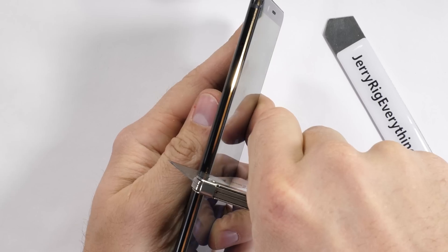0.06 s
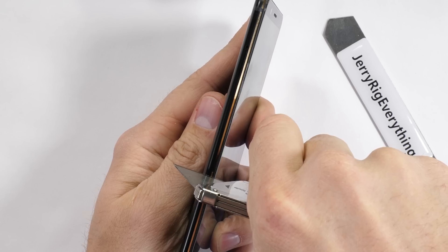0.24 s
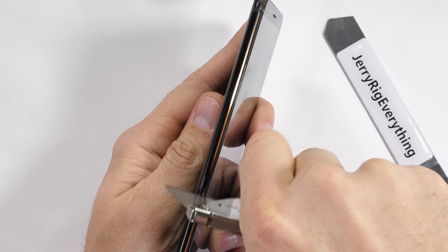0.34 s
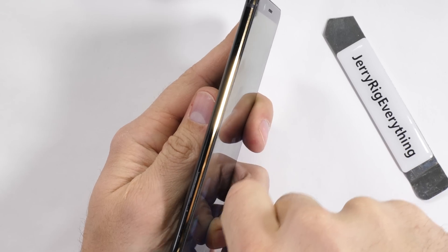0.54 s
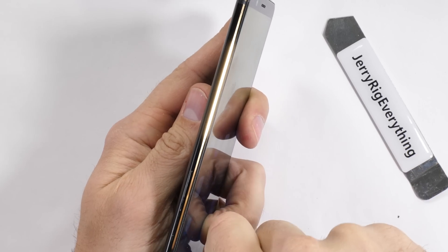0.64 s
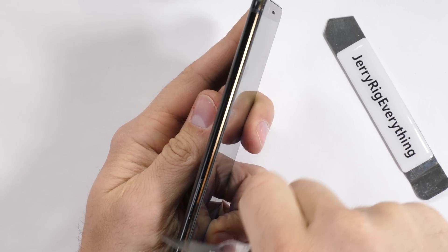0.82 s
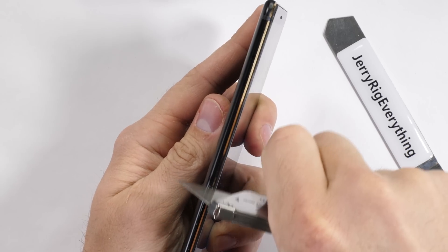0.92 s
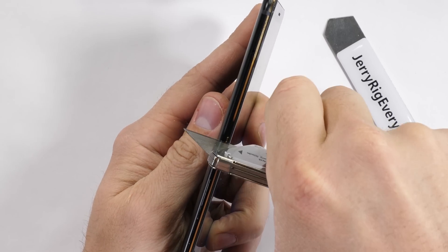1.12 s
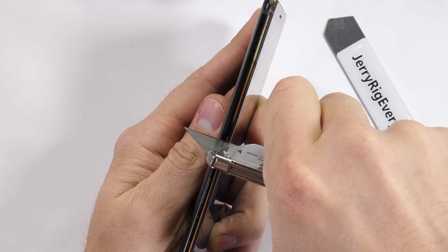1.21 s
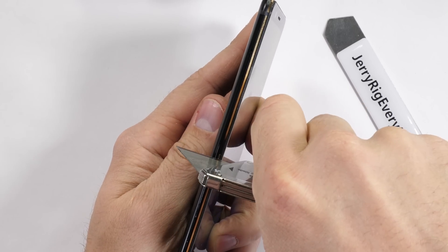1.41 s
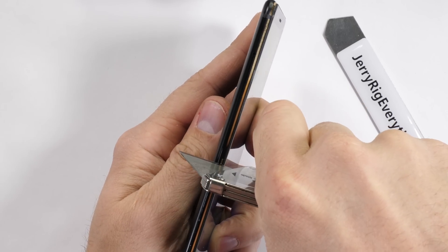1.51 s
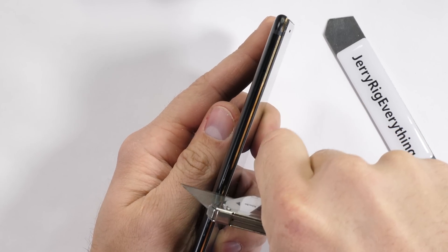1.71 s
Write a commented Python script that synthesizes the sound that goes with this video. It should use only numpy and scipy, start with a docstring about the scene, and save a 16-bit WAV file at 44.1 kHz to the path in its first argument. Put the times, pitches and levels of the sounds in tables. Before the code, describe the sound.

Close, dry scraping of a thin blade on a metal phone frame. A bright click leads into rapid scratches and a falling squeal; after a pause come a duller tap, a soft slide and weaker scratches over faint room air.

```python
"""Faint hum, room air and hand rumble come first, then a tick and a tap as a razor blade is set on the metal
side frame of a phone, close to the microphone. Stuttering scrapes follow: filtered click and hiss noise
that rings sinking resonances. The longest slip squeals as the blade runs off: wavering sines and narrow noise.
A second tap (noise crack, dying modes) leads to a soft slide and lighter slips. A faint room tail follows."""
import sys
import numpy as np
from scipy import signal
from scipy.io import wavfile
from scipy.ndimage import uniform_filter1d

SR = 44100
rng = np.random.default_rng(int(sys.argv[2]) if len(sys.argv) > 2 else 0)


def linear_from_db(decibels):
    """Turn decibels (scalar or array-like) into linear amplitude factors; 0 gives 1."""
    return 10 ** (np.asarray(decibels, float) / 20)


def master(y):
    """Save y as 16-bit WAV."""
    cut = np.clip(np.atleast_2d(y).T, -1, 1)
    pcm = np.round(cut * 32767)  # scale
    wavfile.write(sys.argv[1], SR, pcm.astype(np.int16))


N = 77175  # samples

# Room air: f/Hz, relative density/dB; its swell: t/s, level re AIR_DB/dB
AIR_TONE = [(150, -22), (250, -10), (400, -22.5), (830, -17), (1500, -15), (2160, -13.5), (3170, -9.5),
            (4650, -19.5), (8400, -20.5), (12000, -24), (16000, -28.5)]
AIR_SWELL = [(0, 7), (.04, -7.5), (.085, -2.5), (.11, -3), (.19, 1), (.8, 3), (.95, -6.5), (1.75, -5)]
# Mains hum: f/Hz, rms level/dB
HUM = [(60, -56.5), (120, -64.5)]
# Rumble of hands and table: t/s, level/dB; its spectrum: f/Hz, relative density/dB
RUMBLE_LEVEL = [(0.0, -50), (0.116, -54), (0.32, -50), (0.346, -41), (0.448, -41.5), (0.496, -31.5),
                (0.526, -49.5), (0.55, -30), (0.588, -48), (0.614, -32.5), (0.658, -53.5), (0.764, -48),
                (0.832, -54), (1.35, -52), (1.378, -43), (1.52, -38), (1.594, -52), (1.75, -51)]
RUMBLE_TONE = [(12, -50), (20, 7.5), (80, 8), (173, -7.5), (211, -0.5), (348, -10), (414, -17.5),
               (500, -14.5), (650, -18.5), (1100, -120)]
# Small catches of the blade: t/s, relative level/dB
TICKS = [(0.164, -35), (0.2412, -24.5), (0.82, -42), (0.8442, -43), (0.9129, -35.5), (1.0055, -32),
         (1.274, -42), (1.5594, -31), (1.6163, -35.5)]
# Room tail: f/Hz, relative level/dB, t60/s
ROOM_TAIL = [(500, -0.5, 0.33), (3010, 1.5, 0.24), (5960, 0, 0.11), (9000, -12, 0.2), (14980, -25.5, 0.035)]
# Taps: level/dB, crack re tap/dB, crack high-pass f/Hz, whole-tap high-pass f/Hz
TAP_ONE = (-3, -9, 1501.5, 150.5)
TAP_TWO = (-8.5, -10.5, 1999, 704)
# Modes rung by each tap: f/Hz, level re tap/dB, t60/s
TAP_ONE_MODES = [(8940, 9, 0.0051), (11100, -26, 0.0058), (6210, -10.5, 0.0072), (3180, -14, 0.014),
                 (309.5, -23, 0.014), (490, -26.5, 0.017)]
TAP_TWO_MODES = [(3200, -1, 0.0088), (2055, 1, 0.0081), (1330, -12, 0.019), (4310, -5.5, 0.014),
                 (5800, -18, 0.0047), (7760, -34, 0.01), (9700, -7.5, 0.0041), (12800, -18, .005)]
# Close pair of frame modes: f/Hz
BEAT_HZ = [1783, 1773]
# Blade creeping after the first tap: t/s, level/dB; its spectrum: f/Hz, relative density/dB
CREEP_LEVEL = [(.201, -31.5), (.215, -36.5), (.25, -45), (.3, -58.5), (.335, -83.5)]
CREEP_TONE = [(1290, -38), (2200, -4), (2510, -20), (3200, -8.5), (4530, -13), (7450, -9), (9250, 3),
              (12400, -35.5), (16000, -10)]
# Slips: start/s, length/s, level/dB, peak moment/0-1, contact (0 high on the frame, 1 low, 2 light touch)
SLIPS = [(0.339, 0.018, -20.5, 0.45, 0), (0.365, 0.019, -21.5, 0.78, 0), (.392, 0.018, -22, 0.52, 0),
         (0.408, 0.0084, -33, 0.34, 0), (.418, 0.035, -22.5, 0.25, 0), (0.447, 0.019, -22.5, 0.93, 0),
         (0.4844, 0.011, -23.5, 0.17, 1), (0.486, 0.014, -13.5, 0.78, 1), (0.498, 0.0094, -24.5, 0.18, 0),
         (.508, .011, -25, 0.78, 0), (0.531, 0.0009, -15, 0.056, 0), (0.5355, 0.008, -24.5, 0.083, 0),
         (.541, 0.018, -13.5, 0.45, 1), (0.562, 0.0072, -29.5, 0.47, 0), (0.566, 0.023, -14, 0.34, 1),
         (0.584, 0.01, -24.5, .5, 1), (1.3701, 0.013, -24, 0.087, 2), (1.393, 0.014, -37.5, 0.43, 2),
         (1.414, 0.0012, -30, .1, 2), (1.417, 0.0031, -25, 0.34, 2), (1.421, 0.0038, -26, 0.42, 2),
         (1.436, 0.015, -31, 1, 2), (1.442, .055, -22, 0.15, 2), (1.4787, 0.0017, -34, 0.33, 2),
         (1.504, 0.013, -24, .3, 2), (1.534, 0.005, -32.5, .2, 2), (1.538, 0.0086, -36, .15, 2)]
# Per contact: hiss rms re clicks, snag rms re clicks, swell exponent (low = blunt, high = pointed)
SLIP_HISS = [.4, 3.9, 0.24]
SLIP_SNAG = [0.36, 0.1, 0.94]
SLIP_EXPONENT = [0.48, 0.82, 0.39]
# Scrape spectrum at each contact: f/Hz, relative density/dB
HIGH_TONE = [(120, -52.5), (200, -10.5), (278, -10.5), (612, -14.5), (968, -15), (1080, -6), (1420, -16),
             (1940, -8), (2510, -16.5), (3970, -10.5), (4520, -16.5), (7970, -2.5), (11900, -13.5),
             (13600, -9.5), (16000, -13.5)]
LOW_TONE = [(88, -44), (150, -24.5), (309, -8), (414, -20), (545, -18.5), (837, -34), (1900, -16),
            (2500, -24.5), (3160, -12), (4760, -21), (5250, -3.5), (6910, 4.5), (7620, -16), (10200, -6),
            (16000, -22.5)]
LIGHT_TONE = [(88, -36), (150, -20.5), (1120, -10.5), (1360, -11), (1980, -7), (2700, -14), (3290, -12),
              (4760, -18.5), (6390, -14), (7470, 1), (11900, -20), (14200, 0), (16000, -15)]
# Resonances at each contact: start f/Hz, width/Hz, level re drive/dB, fall during the slip/Hz (negative rises)
HIGH_RING = [(8740, 660, -3, 140), (2040, 90, -12.5, 100)]
LOW_RING = [(6980, 140, -5, 58), (6200, 150, -17, 29), (5620, 110, -15, 619.5), (4490, 96, -20.5, 30),
            (3320, 90, -20, 55.5), (1900, 88, -14, -49.5)]
LIGHT_RING = [(7420, 170, -16, 150), (5860, 110, -24.5, 30), (2000, 140, -25.5, 73)]
# Run-off scrape: t/s, level/dB; its spectrum: f/Hz, relative density/dB
RUNOFF_LEVEL = [(.6052, -17), (.611, -16), (.622, -25), (.64, -22), (.66, -31.5), (.673, -23.5), (.69, -27),
                (.715, -33.5), (.74, -50.5), (.8, -63), (.92, -62)]
RUNOFF_TONE = [(180, -61), (400, -38), (650, -31.5), (900, -16), (1300, -28), (2070, -9.5), (2500, -21),
               (3200, -5.5), (3900, -21), (5000, -6), (6500, -9), (8000, -20.5), (12000, -19.5),
               (16000, -36.5)]
# Blade squeals, frame ring and treble sheen of the run-off: t/s, f/Hz, level/dB
SQUEAL_LOW = [(.6052, 5685, -29.5), (.610, 5607, -6), (.613, 5627, -14.5), (.616, 5653, -14.5),
              (.621, 5568, -37.5), (.625, 5580, -3), (.6285, 5516, -28.5), (.636, 5376, -5),
              (.6415, 5390, -21), (.6475, 5402, -3), (.656, 5276, -21.5), (.661, 4907, -21),
              (.670, 4620, -15), (.679, 4510, -33.5), (.715, 4500, -40), (.74, 5270, -44), (.92, 5290, -81)]
SQUEAL_HIGH = [(.6052, 6900, -33.5), (.613, 6850, -5), (.620, 6850, -17), (.628, 6870, -13.5),
               (.636, 6600, -30), (.643, 6420, -18.5), (.653, 6350, -24), (.658, 6210, -16),
               (.665, 6150, -32.5), (.671, 6030, -17.5), (.68, 6050, -53.5), (.715, 6400, -52.5),
               (.8, 6400, -61)]
FRAME_RING = [(.6052, 1900, -28), (.613, 1985, -31), (.619, 1995, -16.5), (.628, 1985, -19),
              (.642, 2043, -26.5), (.66, 2080, -27), (.68, 2045, -44), (.689, 2097, -28),
              (.71, 2050, -32.5), (.721, 2000, -29.5), (.74, 2040, -58), (.8, 2060, -78.5)]
SHEEN = [(.605, 12900, -32), (.611, 12800, -12), (.65, 11000, -24), (.675, 11300, -26.5), (.69, 10500, -39),
         (.72, 9300, -53)]
# Clean tone in squeals and ring: t/s, share/0-1
CLEAN_SHARE = [(.6, 0.7), (.65, 0.75), (.665, 0.42), (.74, 0)]
# Slide after the second tap: t/s, gain/dB; its spectrum: f/Hz, relative density/dB
SLIDE_GAIN = [(1.067, -26), (1.08, -42.5), (1.12, -40.5), (1.16, -41.5), (1.185, -62), (1.22, -80)]
SLIDE_TONE = [(400, -44.5), (800, -40), (1300, -12.5), (1950, -6), (2300, -13.5), (2650, -27.5),
              (3100, -3.5), (3500, -9.5), (3800, -10.5), (4100, -23), (4400, -10), (4800, -14.5),
              (5170, -13), (6000, -22), (7700, -30.5), (9000, -18.5), (10800, -35.5), (11700, -27.5),
              (16000, -38)]
# Frame resonance under the slide: f/Hz, width/Hz, level re rub/dB
SLIDE_RING = (3464, 380, -12.5)

AIR_DB, ROOM_DB = -56.5, -17.5
TICK_DECAY_S = 0.0012
TAP_ONE_S, TAP_TWO_S = 0.1996, 1.0634
CRACK_T60_S, TAP_RISE_S = 0.018, 0.00035
BEAT_DB, BEAT_T60_S = -26, 0.22  # dB of each mode
CLICKS_PER_S, CLICK_SPREAD_DB, HISS_RATIO = 4000, 4, 0.87
SNAGS_PER_S = 410
SQUEAL_WIDTH_HZ, RING_WIDTH_HZ, SHEEN_WIDTH_HZ = 96, 75, 4100
WOBBLE_RATIO, WOBBLE_S = 0.012, 0.0037  # rms pitch deviation, smoothing time
LOWPASS_HZ = 15850


def evened(x):
    """Scale to rms 1."""
    return x / np.sqrt(np.mean(x ** 2) + 1e-20)


def along(rows, col, outside=None):
    """Interpolate one column over time, per sample."""
    rows = np.asarray(rows, float)
    return np.interp(np.arange(N) / SR, rows[:, 0], rows[:, col], outside, outside)


def colour(x, tone):
    """Minimum-phase filter of unit energy with the given spectrum."""
    f, db = np.transpose(tone)
    hz = np.abs(np.fft.fftfreq(8192, 1 / SR))
    tone_db = np.interp(np.log(hz + 1), np.log(f + 1), np.maximum(db, -90))
    log_gain = np.log(linear_from_db(tone_db))
    phase = -signal.hilbert(log_gain).imag
    taps = np.fft.ifft(np.exp(log_gain + 1j * phase)).real[:4096]
    return signal.oaconvolve(x, taps / np.linalg.norm(taps))[:N]


def resonate(x, hz, width_hz):
    """Resonance following the curve hz: shift to 0 Hz, one-pole low-pass, shift back; rms 1."""
    turn = np.exp(2j * np.pi * np.cumsum(hz) / SR)
    pole = np.exp(-np.pi * width_hz / SR)
    slow = signal.lfilter([1 - pole], [1, -pole], x / turn)
    return evened((turn * slow).real)


def chatter(snag=0, hiss=HISS_RATIO):
    """Edge catching on metal: dense clicks of uneven size, sparse larger snags, fine hiss; rms 1."""
    chance, size, noise = rng.random(N), rng.exponential(1, N), rng.standard_normal(N)
    sign = np.sign(noise)
    clicks = (chance < CLICKS_PER_S / SR) * sign * linear_from_db(CLICK_SPREAD_DB * np.minimum(size, 4))
    at = np.cumsum(SR / SNAGS_PER_S * rng.uniform(0.5, 1.5, N))
    snags = np.zeros(N)
    snags[at[at < N].astype(int)] = 1
    snags *= sign * rng.uniform(0.35, 1, N)
    return evened(evened(clicks) + snag * evened(snags) + hiss * rng.standard_normal(N))


def background():
    """Room air and hand rumble as filtered noise, mains hum as sines."""
    t = np.arange(N) / SR
    air = colour(rng.standard_normal(N), AIR_TONE) * linear_from_db(AIR_DB + along(AIR_SWELL, 1))
    hum = sum(linear_from_db(db) * np.sqrt(2) * np.sin(2 * np.pi * hz * t) for hz, db in HUM)
    rumble = colour(rng.standard_normal(N), RUMBLE_TONE + [(2000, -93)])
    return air + hum + rumble * linear_from_db(along(RUMBLE_LEVEL, 1))


def ticks():
    """Tiny catches of the resting blade: noise with abrupt onset and exponential decay."""
    t = np.arange(N) / SR
    push = sum(linear_from_db(db) * (t > s) * np.exp(-np.abs(t - s) / TICK_DECAY_S) for s, db in TICKS)
    return colour(0.5 * push * rng.standard_normal(N), HIGH_TONE)


def room(x):
    """Short, faint noise tail, its decay and level set by frequency; the highest treble is weakest and shortest."""
    hz, t, z = signal.stft(rng.standard_normal(SR // 2), SR, nperseg=128)
    f, db, t60 = np.transpose(ROOM_TAIL)
    decay = linear_from_db(-60 * t / np.interp(hz, f, t60)[:, None])
    tail = signal.istft(z * decay, SR, nperseg=128)[1]
    wet = signal.fftconvolve(x, tail / np.linalg.norm(tail))[:N]
    return colour(wet, np.transpose([f, db])) * linear_from_db(ROOM_DB)


def tap(start_s, db, crack_db, crack_hz, body_hz, modes):
    """A blow: high-passed noise crack and exponentially dying modes."""
    t = np.maximum(np.arange(N) / SR - start_s, 0)
    ring = sum(linear_from_db(mode_db - 60 * t / t60) * np.sin(2 * np.pi * hz * t) for hz, mode_db, t60 in modes)
    crack_filter = signal.butter(2, crack_hz, "high", fs=SR, output="sos")
    crack = signal.sosfilt(crack_filter, rng.standard_normal(N)) * linear_from_db(crack_db - 60 * t / CRACK_T60_S)
    blow = linear_from_db(db) * (ring + crack) * np.minimum(t / TAP_RISE_S, 1)
    return signal.sosfilt(signal.butter(2, body_hz, "high", fs=SR, output="sos"), blow)


def ping():
    """Two close frame modes beat and die away after the first tap, without room tail."""
    t = np.maximum(np.arange(N) / SR - TAP_ONE_S, 0)
    pair = sum(np.sin(2 * np.pi * hz * t) for hz in BEAT_HZ)
    return linear_from_db(BEAT_DB - 60 * t / BEAT_T60_S) * pair


def creep():
    """Blade creeping after the first tap: fading filtered chatter."""
    return colour(chatter() * linear_from_db(along(CREEP_LEVEL, 1, -99)), CREEP_TONE)


def slips():
    """Each slip swells and stops; contact sets its colour, and its resonances shift as the edge travels."""
    t = np.arange(N) / SR
    push, travel = np.zeros((3, N)), np.zeros((3, N))
    for start, length, db, peak, contact in SLIPS:
        k = int(round(contact))
        progress = (t - start) / length
        shape = np.interp(progress, [0, np.clip(peak, 0.02, 0.98), 1], [0, 1, 0])
        push[k] += linear_from_db(db) * np.sin(np.pi / 2 * shape) ** SLIP_EXPONENT[k]
        travel[k, t > start] = np.minimum(progress[t > start], 1)
    drives = np.array([chatter(snag, hiss) for snag, hiss in zip(SLIP_SNAG, SLIP_HISS)]) * push
    out = sum(colour(x, tone) for x, tone in zip(drives, (HIGH_TONE, LOW_TONE, LIGHT_TONE)))
    for x, way, modes in zip(drives, travel, (HIGH_RING, LOW_RING, LIGHT_RING)):
        for hz, width_hz, db, fall_hz in modes:
            out += np.std(x) * linear_from_db(db) * resonate(x, hz - fall_hz * way, width_hz)
    return out


def runoff():
    """Long slip: scrape, two sinking blade squeals, wavering frame ring, broad treble sheen."""
    out = colour(chatter() * linear_from_db(along(RUNOFF_LEVEL, 1, -99)), RUNOFF_TONE)
    share = np.clip(along(CLEAN_SHARE, 1), 0, 1)
    tones = ((SQUEAL_LOW, SQUEAL_WIDTH_HZ), (SQUEAL_HIGH, SQUEAL_WIDTH_HZ), (FRAME_RING, RING_WIDTH_HZ))
    for curve, width_hz in tones:
        wobble = evened(uniform_filter1d(rng.standard_normal(N), int(WOBBLE_S * SR)))
        hz = along(curve, 1) * (1 + WOBBLE_RATIO * wobble)
        clean = np.sqrt(2) * np.sin(2 * np.pi * np.cumsum(hz) / SR)
        rough = resonate(chatter(), hz, width_hz)
        out += (share * clean + (1 - share) * rough) * linear_from_db(along(curve, 2, -99))
    hz = along(SHEEN, 1)
    sheen = resonate(resonate(chatter(), hz, SHEEN_WIDTH_HZ), hz, SHEEN_WIDTH_HZ)
    return out + sheen * linear_from_db(along(SHEEN, 2, -99))


def slide():
    """Blade slides softly after the second tap: hissy chatter ringing one frame resonance."""
    hz, width_hz, db = SLIDE_RING
    rub = chatter(hiss=1.5)
    ring = linear_from_db(db) * resonate(rub, np.full(N, hz), width_hz)
    return colour((rub + ring) * linear_from_db(along(SLIDE_GAIN, 1, -99)), SLIDE_TONE)


def scene():
    """Mix blade, its room tail, the dry ping and the background."""
    blade = slips() + runoff()
    blade += tap(TAP_ONE_S, *TAP_ONE, TAP_ONE_MODES) + tap(TAP_TWO_S, *TAP_TWO, TAP_TWO_MODES)
    blade += ticks() + slide() + creep()
    return (blade + room(blade) + ping() + background())[None]


def band_limit(x):
    """A steep low-pass at the top of the band."""
    return signal.sosfilt(signal.butter(12, 16230, fs=SR, output="sos"), x)


def record(dry):
    """Band limit, then full-scale clipping."""
    lowpass = signal.firwin(255, LOWPASS_HZ, window=("kaiser", 6), fs=SR)
    limited = signal.oaconvolve(dry, lowpass[None], "same")
    mix = np.clip(limited, -1, 1)
    return band_limit(mix)


dry = scene()
out = record(dry)
master(out)
```